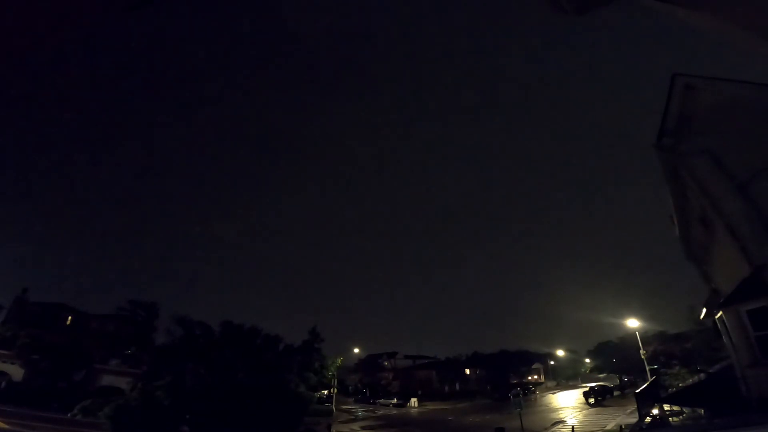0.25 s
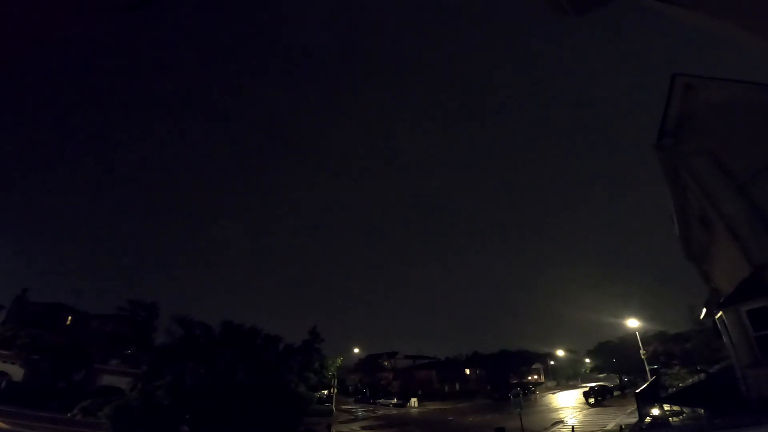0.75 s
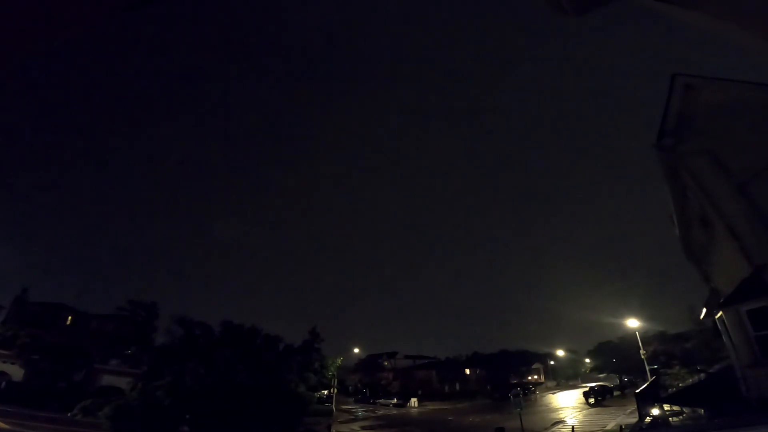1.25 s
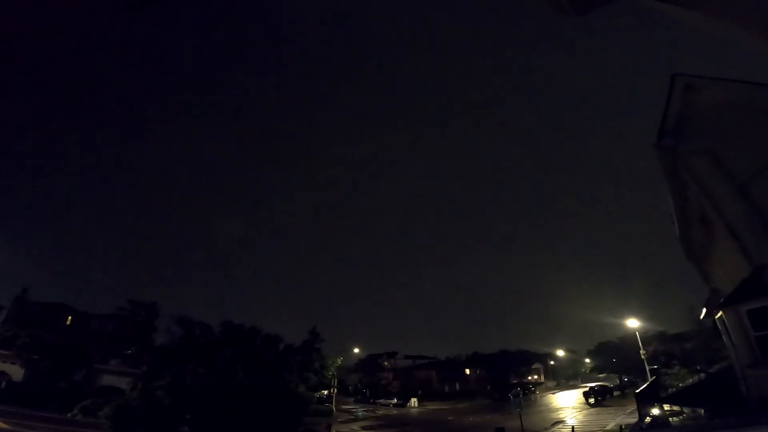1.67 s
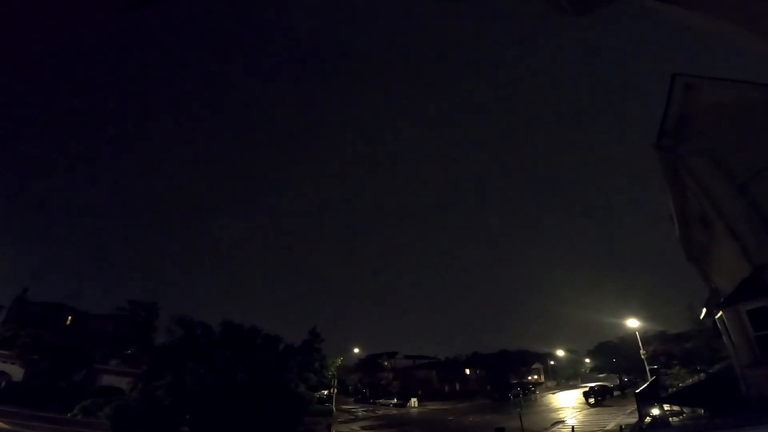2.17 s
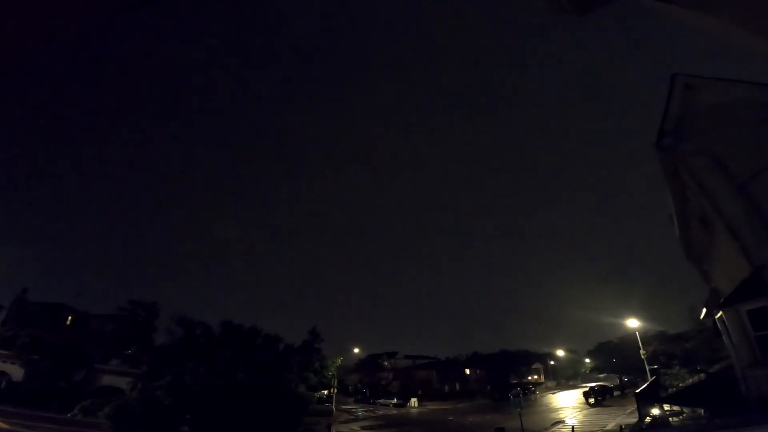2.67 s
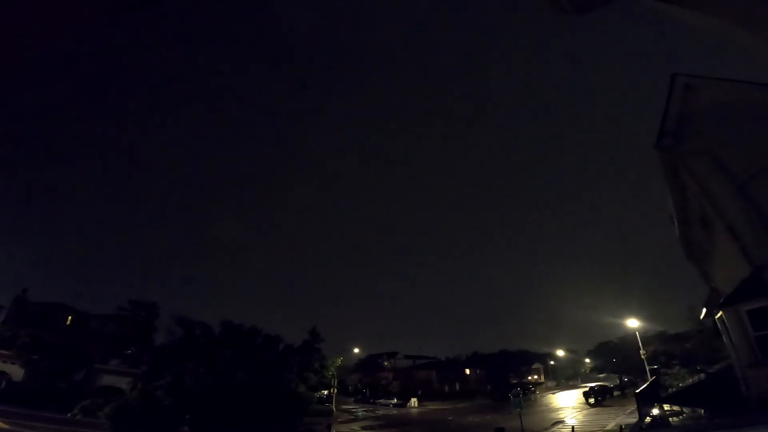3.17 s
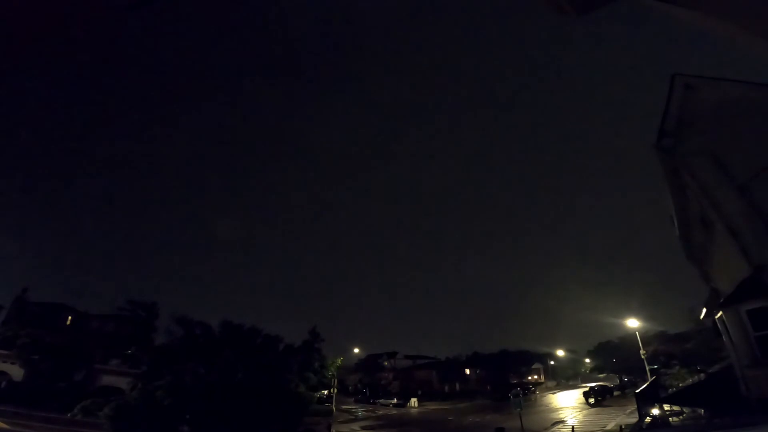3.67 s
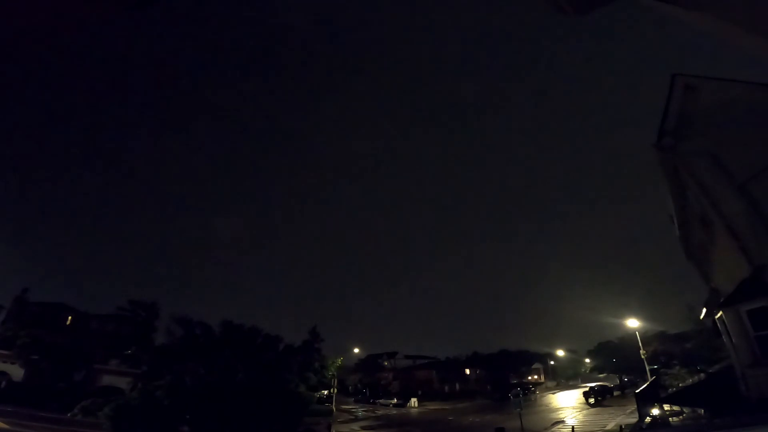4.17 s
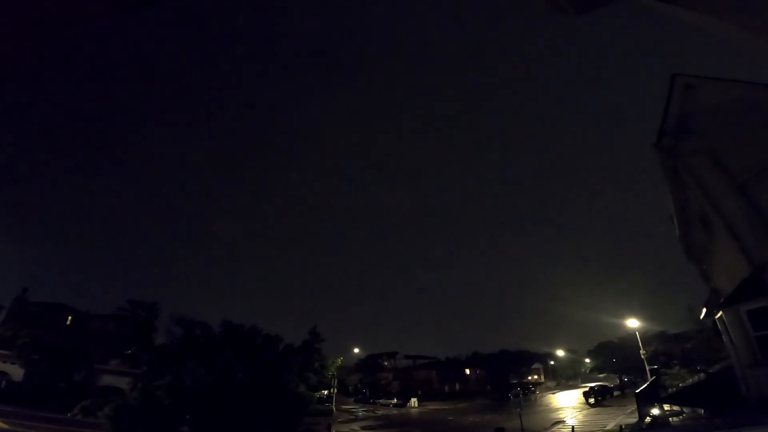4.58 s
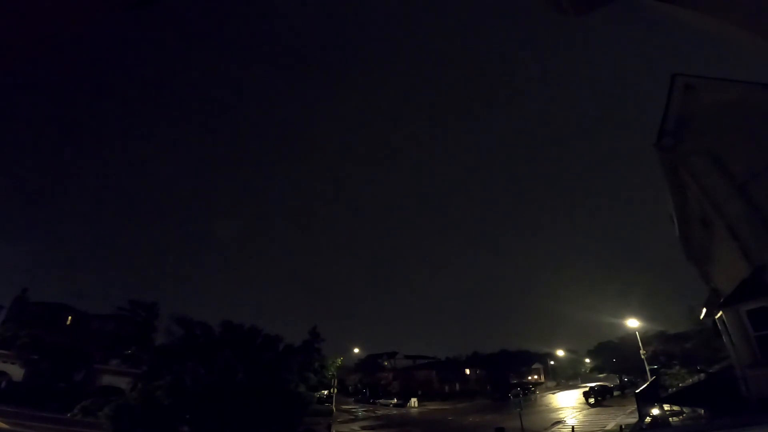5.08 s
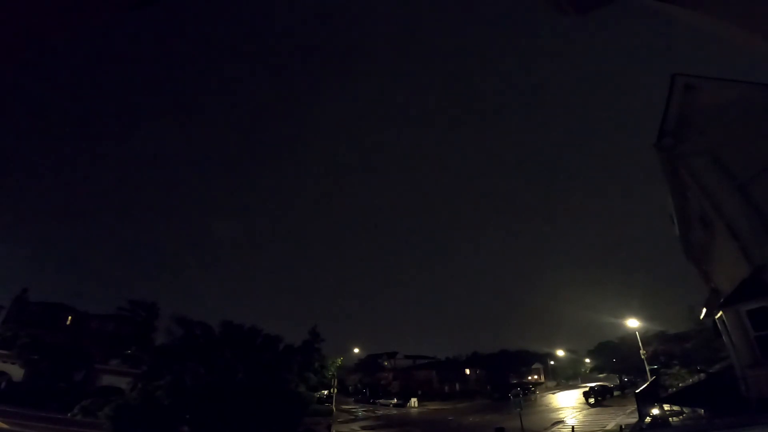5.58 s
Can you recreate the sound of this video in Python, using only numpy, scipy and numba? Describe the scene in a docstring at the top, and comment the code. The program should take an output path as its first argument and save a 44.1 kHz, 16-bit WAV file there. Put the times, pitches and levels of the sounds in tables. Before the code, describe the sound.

Outdoor stereo pickup under house fronts: a quiet start of rain wash and faint high chirps, then deep thunder arrives in tumbling bumps and muffled cracks. It peaks just before three seconds, heaves again around four and five, then sinks away. Drips tap sharply near the microphone throughout. Bird warbles poke through the later rumble, and the rain dips slightly under the loudest rolls.

```python
"""A street at night between house fronts: distant thunder rolls in waves over light rain, drops and birds.
Rain is filtered noise and patter; near drops are band-limited bursts; three birds are gliding near sines.
Thunder sums dense impulses in three bands with N-shaped claps, sharp cracks and low thuds.
House fronts scatter echoes to two close microphone ports; a slow gain control ducks the rain
under the loudest rolls."""
import sys
import numpy as np
from scipy import signal
from scipy.fft import rfft, irfft, next_fast_len
from scipy.io import wavfile
from scipy.ndimage import uniform_filter1d
from numba import njit

SR = 44100
rng = np.random.default_rng(int(sys.argv[2]) if len(sys.argv) > 2 else 0)


def gain_from_db(level_db):
    """Convert decibel levels to linear amplitude factors (20 dB per decade)."""
    decades = np.asarray(level_db, float) / 20
    return 10 ** decades


def pcm_store(signal):
    """Save signal as 16-bit PCM."""
    levels = np.round(np.clip(np.atleast_2d(signal), -1, 1) * 32767)
    wavfile.write(sys.argv[1], SR, levels.astype(np.int16).T)


N = 257103
TIME = np.arange(N) / SR
SIZE = next_fast_len(N + SR)  # room for echoes past the end
FREQ = np.maximum(np.fft.rfftfreq(SIZE, 1 / SR), 1)

# how the two ports differ: f/Hz, left minus right level/dB, phase by which left leads/rad,
# share of steady sound from the front (0-1)
PORT_PAIR = [(25, .9, 0, .993), (60, .5, 0, .998), (200, .5, -.06, .997), (400, .9, -.15, .975),
             (700, 1.5, -.35, .91), (1300, 2, -.75, .76), (1950, 2.5, -1.2, .71), (2500, 3, -.2, .71),
             (4000, 3, -.5, .56), (4800, 2, -.8, .46), (5800, 1, -2.8, .46), (8000, -.5, -2, .31),
             (10000, -1.5, -1.3, .41), (15000, -2, -1, .51)]


def on_freq(table, column=1):
    """Spectral interpolation: a table column drawn straight on a log-frequency axis."""
    rows = np.array(table, float)
    return np.interp(np.log(FREQ), np.log(rows[:, 0]), rows[:, column])


def shape(x, gain):
    """Linear filtering: multiply the spectrum by a gain."""
    return irfft(rfft(x, SIZE) * gain, SIZE)[..., :N]


def unit(x):
    """Normalisation of power: scale to rms 1."""
    return x / np.sqrt(np.mean(x ** 2))


def walk(rate):
    """Slow random modulation: levels held 1 / rate s and slewed twice, with a spread near 1."""
    hold = int(SR / rate)
    steps = np.repeat(rng.standard_normal(N // hold + 1), hold)
    return 1.3 * uniform_filter1d(uniform_filter1d(steps, hold), hold)[:N]


def clicks(rate, scatter_db):
    """Shot noise: impulses at random moments, rate per second, mostly small with a few large."""
    when, sign, luck = rng.random((3, N))
    size = gain_from_db(-scatter_db * np.log(luck + .01))
    return (when < rate / SR) * np.sign(sign - .5) * size


def walls(x, t60, gap_s):
    """Diffuse reflection: decaying echoes off the house fronts, different at each port, total energy 1."""
    t = np.arange(SR // 2) / SR
    tail = rng.standard_normal((2, len(t))) * 1000. ** (-t / t60) * (t > gap_s)
    tail = tail / np.sqrt((tail ** 2).sum(axis=1, keepdims=True))
    return signal.fftconvolve(x[None], tail, axes=1)[:, :N]


def ports(front, around, share):
    """Spatial coherence: front sound keeps the ports' level and phase offset, sound from around is unrelated."""
    side = np.array([[.5], [-.5]])
    lean = gain_from_db(side * on_freq(PORT_PAIR))
    turn = np.exp(1j * side * on_freq(PORT_PAIR, column=2))
    share = np.clip(share, 0, 1)
    direct = shape(front, lean * turn * np.sqrt(share))
    return direct + shape(around, lean * np.sqrt(1 - share))


def rain():
    """Superposed drop impacts: a far wash flickering by octave, with fine patter and sparse splashes."""
    # colour of the rain: f/Hz, relative level/dB
    colour = [(60, -63), (170, -20.5), (400, -6), (700, -2), (1100, 2.5), (1550, -1.5), (1900, -0.5),
              (2250, -9), (2480, -4.5), (2700, -4), (3000, -8.5), (3400, -7.5), (4000, -11), (5600, -12.5),
              (7000, -18.5), (9000, -23), (11000, -35), (12500, -37.5), (15000, -54.5), (17000, -73.5)]
    gust = walk(0.83)
    # three signals each: front, left and right
    patter = np.array([unit(clicks(1100, scatter_db=5.0)) for _ in range(3)])
    noise = rng.standard_normal((3, N))
    # a nearer drop lifts the hiss for the few ms of its splash
    splash = signal.lfilter([1], [1, -np.exp(-1 / (.005 * SR))], np.abs(clicks(22, scatter_db=3)))
    wash = 0
    for hz in 250 * 2. ** np.arange(7):
        octave = np.cos(np.pi / 2 * np.clip(np.log2(FREQ / hz), -1, 1)) ** 2
        spray = noise * (1 + .42 * min(hz / 8000, 1) * splash)
        flicker = gain_from_db(0.4 * gust + 1.0 * walk(11))
        wash = wash + shape(spray + .5 * patter, octave) * flicker
    wash = gain_from_db(-46.5) * unit(shape(wash, gain_from_db(on_freq(colour))))
    return ports(wash[0], wash[1:], on_freq(PORT_PAIR, column=3))


def small_drops():
    """Poisson arrivals: random drops (s, dB, Hz, width Hz, left minus right dB), weaker towards high pitch."""
    rate, low_hz, high_hz = 60, 1800, 11000  # drops a second, range of centres
    base_db, scatter_db, fall_db = -54, 4, 6  # fall per octave above the lowest centre
    when, pitch, luck, side = rng.random((600, 4)).T
    s = np.cumsum(-np.log(1 - when)) / rate
    hz = low_hz * (high_hz / low_hz) ** pitch
    db = base_db - scatter_db * np.log(luck + .03) - fall_db * np.log2(hz / low_hz)
    rows = zip(s, db, hz, .8 * hz, 8 * side - 2)
    return [row for row in rows if row[0] < N / SR - .06]


def drops():
    """Impact excitation: each drop is a quick splat in its own band, duller on top, then a short splash."""
    # single drops close by: t/s, peak level/dB, centre f/Hz, width/Hz, left minus right level/dB
    near_drops = [(.164, -54, 8500, 2000, 4), (.571, -38, 5500, 5000, 1), (.6913, -42, 3000, 2500, 2),
                  (.7776, -44, 3500, 3000, 2), (1.0214, -42, 7500, 6000, 0), (1.4162, -41, 3500, 3000, 3),
                  (1.4785, -44, 3500, 3000, 2), (1.694, -27, 3200, 3600, 5), (1.808, -46, 6500, 3500, 2),
                  (1.9634, -47, 8500, 2500, 5), (1.9929, -39, 2500, 900, 2), (2.0024, -44, 2800, 1500, 2),
                  (2.1485, -43, 3600, 2000, 2), (2.5077, -35, 4200, 3600, 1), (2.7621, -37, 4300, 4600, -1),
                  (2.9487, -38, 6900, 1500, 0), (3.2264, -50, 12000, 5000, -1),
                  (3.7394, -42, 4500, 3500, 2), (4.2153, -45, 3000, 1500, 4), (4.2383, -44, 2400, 2000, 3),
                  (4.9024, -47, 5500, 2500, 3), (5.1692, -44, 3500, 2500, 1), (5.4084, -48, 11000, 4000, 0),
                  (5.445, -40, 3600, 3600, 2)]
    out = np.zeros((2, N))
    t = np.arange(SR // 20) / SR
    fall = .2 * np.exp(-t / .002) + .15 * np.exp(-t / .008)
    dull = signal.butter(2, 4000, fs=SR, output="sos")
    for s, db, hz, width, pan_db in near_drops + small_drops():
        band = signal.butter(3, [hz - width / 2, hz + width / 2], "bandpass", fs=SR, output="sos")
        burst = 2 * (t == 0) + rng.standard_normal(len(t)) * fall
        splat = signal.sosfilt(np.vstack([band, dull]), burst)
        levels = gain_from_db(db + np.array([[pan_db / 2], [-pan_db / 2]]))
        k = int(s * SR)
        out[:, k:k + len(t)] += levels * splat / np.abs(splat).max()
    # they land close and ahead, so the ports differ less in phase
    direct = shape(out, np.exp(1j * np.array([[.4], [-.4]]) * on_freq(PORT_PAIR, column=2)))
    return direct + gain_from_db(-9) * walls(out.mean(axis=0), t60=.2, gap_s=.003)


def whistle(note):
    """Frequency modulation: a near sine along a note's pitch and level; the throat rounds every turn."""
    s, hz, db = np.transpose(note)
    edge = np.clip(np.minimum(TIME - s[0], s[-1] - TIME) / 0.0024, 0, 1)
    hz, db = (uniform_filter1d(np.interp(TIME, s, c), size=220) for c in (hz, db))
    return np.sqrt(2) * edge * gain_from_db(db) * np.sin(2 * np.pi * np.cumsum(hz) / SR)


def plain(s, length, first_hz, last_hz, db):
    """Linear glide: pitch moves straight; the level is held between slightly louder ends."""
    share = np.array([0, .3, .7, 1])  # of the length
    levels = db + 1.5 * np.array([1, 0, 0, 1])
    return whistle(np.transpose([s + share * length, first_hz + share * (last_hz - first_hz), levels]))


def birds():
    """Comb filtering: a ground echo beads the near singer's higher glides; all three ring off the walls."""
    # the near singer's slurred phrases, one table each: t/s, f/Hz, source level/dB
    slurs = [
        [(3.228, 4140, -54), (3.24, 3730, -44.5), (3.254, 3310, -42), (3.268, 2940, -41.5), (3.285, 2570, -46),
         (3.308, 2270, -51)],
        [(3.326, 2795, -63), (3.334, 3400, -40.5), (3.343, 3660, -43), (3.358, 3290, -37), (3.37, 2870, -39.5),
         (3.383, 2510, -52), (3.395, 2310, -54), (3.415, 2190, -49), (3.428, 2200, -53.5), (3.445, 2310, -48),
         (3.482, 2570, -46), (3.5, 2680, -46.5), (3.517, 2560, -56)],
        [(3.894, 2810, -49), (3.918, 2910, -38.5), (3.93, 3010, -44.5), (3.952, 3040, -44.5)],
        [(4.538, 3130, -37), (4.562, 3186, -39.5), (4.578, 3150, -39), (4.604, 2884, -35), (4.616, 2920, -41),
         (4.626, 3125, -41), (4.643, 3200, -37), (4.658, 3220, -47), (4.672, 2950, -36.5), (4.69, 2790, -38.5),
         (4.716, 2790, -42)],
        [(5.698, 2540, -47), (5.709, 2645, -43), (5.716, 3230, -41), (5.726, 3150, -39), (5.734, 3230, -33),
         (5.741, 3350, -27.5), (5.745, 3820, -36), (5.753, 2450, -33)],
    ]
    # its plain notes; the first, faint one is the warble's echo ringing on:
    # start t/s, length/s, first f/Hz, last f/Hz, held source level/dB
    near_notes = [(4.71, .12, 3130, 3180, -52), (5.68, .018, 3300, 3340, -45),
                  (5.755, .029, 3270, 3370, -43), (5.776, .033, 2620, 2260, -47)]
    # the high singer's plain notes: start t/s, length/s, first f/Hz, last f/Hz, held source level/dB
    high_notes = [(.03, 0.018, 5100, 5000, -57), (.052, .018, 4200, 4150, -57),
                  (.088, .013, 7550, 7650, -56), (.102, .018, 7850, 8150, -60),
                  (.122, 0.03, 7930, 7900, -57.5), (.152, .016, 8000, 8300, -61),
                  (.166, .014, 7360, 7050, -65)]
    # the far, low singer, heard with some ring off the walls, each note from its own side:
    # start t/s, length/s, first f/Hz, last f/Hz, held source level/dB, left minus right level/dB
    far_notes = [(3.965, 0.087, 2205, 2235, -51, 8), (4.068, 0.042, 2480, 2270, -51, -11.5),
                 (4.112, 0.062, 2290, 2410, -58, -14), (5.207, 0.025, 2480, 2440, -49.5, -17),
                 (5.239, .035, 2450, 2020, -52, -2)]
    warble = sum(whistle(slur) for slur in slurs) + sum(plain(*note) for note in near_notes)
    high = sum(plain(*note) for note in high_notes)
    # the ground returns only the higher pitches, 2.4 ms late
    ground = .92 / (1 + (2600 / FREQ) ** 12) * np.exp(-2j * np.pi * FREQ * .0024)
    flutter = gain_from_db(1.5 * walk(70))
    song = (shape(warble, .6 * (1 + ground)) + high) * flutter
    ring = shape(walls(.7 * warble + high, t60=.6, gap_s=.006), 1 / (1 + (FREQ / 5000) ** 4))
    near = ports(song, ring, 0.82)
    side = np.array([[.5], [-.5]])
    low = sum(gain_from_db(side * pan_db) * plain(*note) for *note, pan_db in far_notes)
    return near + ports(low, walls(low.mean(axis=0), t60=.25, gap_s=0.01), 0.74)


def claps():
    """N-wave: each clap is a rounded shock of pressure, a push and then a pull."""
    # claps that stand out of the roll: t/s, peak level/dB, length/ms
    clap_rows = [(.7152, -11, 3.4), (1.111, -19, 3.4), (1.453, -13, 4), (1.647, -11, 3.6),
                 (1.7575, -16, 2.2), (2.047, -18, 2.6), (2.689, -11, 3.4), (3.541, -21, 2.6),
                 (3.778, -20, 2.6), (3.873, -17, 3.6), (4.271, -23, 2.6), (4.543, -23, 2.4),
                 (4.905, -19, 3.6), (5.014, -17, 4)]
    out = np.zeros(N)
    for s, db, length_ms in clap_rows:
        u = (TIME - s) / (length_ms / 4000) - 2  # -2 to 2 over the length
        out += gain_from_db(db) * -u * np.exp(.5 - u ** 2 / 2)
    return out


def cracks():
    """Impulse response: each crack is one steep front and a short rough tail, dulled by the distance."""
    # sharp cracks on top of the roll: t/s, peak level/dB
    crack_rows = [(0.648, -37.5), (0.718, -23), (1.031, -31), (1.172, -38.5), (1.294, -23.5), (1.328, -26),
                  (1.438, -29.5), (1.461, -23.5), (1.522, -26.5), (1.651, -19), (1.757, -25.5),
                  (2.047, -27.5), (2.407, -25), (2.652, -26.5), (2.689, -21), (2.711, -26.5), (2.785, -26),
                  (3.502, -28), (3.542, -26), (3.78, -31.5), (3.878, -30.5), (4.545, -31), (5.06, -34),
                  (5.147, -24)]
    out = np.zeros(N)
    t = np.arange(SR // 20) / SR
    band = signal.butter(4, [380, 850], "bandpass", fs=SR, output="sos")
    for s, db in crack_rows:
        tail = .12 * rng.standard_normal(len(t)) * np.exp(-t / .008)
        crack = signal.sosfilt(band, (t == 0) + tail)
        k = int(s * SR)
        out[k:k + len(t)] += gain_from_db(db) * crack / np.abs(crack).max()
    return out


def thuds():
    """Damped oscillation: each thud is a few cycles of one low pitch that rise fast and die away."""
    # low thuds inside the roll: t/s, peak level/dB, f/Hz
    thud_rows = [(0.659, -13.5, 196), (1.074, -12, 153), (1.331, -12.5, 137), (1.383, -14.5, 95),
                 (1.42, -13, 330), (1.429, -15.5, 105), (1.457, -18.5, 380), (1.46, -15, 150),
                 (1.492, -14, 115), (1.533, -15.5, 120), (1.551, -13.5, 145), (1.565, -15.5, 105),
                 (1.617, -14, 85), (1.646, -10, 150), (1.671, -16.5, 190), (1.721, -10.5, 150),
                 (1.758, -14, 110), (1.873, -10, 153), (2.007, -15, 127), (2.201, -12, 183),
                 (2.359, -13.5, 170), (2.404, -18.5, 180), (2.513, -17.5, 170), (2.567, -16, 145),
                 (2.612, -12.5, 130), (2.626, -12.5, 170), (2.675, -11.5, 210), (2.69, -13, 200),
                 (2.7, -12, 85), (2.733, -4, 155), (2.74, -12.5, 390), (2.77, -10.5, 220),
                 (2.793, -9.5, 250), (2.806, -9.5, 260), (2.82, -13.5, 65), (2.845, -14.5, 170),
                 (2.98, -16.5, 170), (3.022, -9, 150), (3.718, -14.5, 116), (3.888, -19, 160),
                 (3.914, -11.5, 110), (4.78, -17, 140), (4.793, -17, 250), (4.808, -15.5, 105),
                 (4.838, -21.5, 85), (4.885, -10.5, 180), (4.985, -22, 95), (5.01, -12.5, 190),
                 (5.037, -16.5, 240), (5.06, -19, 130), (5.072, -14.5, 260), (5.107, -14, 200),
                 (5.128, -12, 190), (5.332, -23, 215)]
    rise_cycles = 1.22
    out = np.zeros(N)
    for (s, db, hz), turn in zip(thud_rows, rng.random(len(thud_rows))):
        u = np.maximum(TIME - s, 0) * hz / rise_cycles
        out += gain_from_db(db) * u * np.exp(1 - u) * np.sin(2 * np.pi * (hz * TIME + turn))
    return out


def thunder():
    """Superposed shock fronts: a long crooked channel sends them densely; three bands swell apart."""
    # thunder arriving: t/s, body level/dB, crackle level relative to the body/dB
    rolls = [(0, -31.5, -12), (0.451, -31.5, -11), (.7, -23, -4.5), (.84, -27, -6), (1.03, -24, -9),
             (1.09, -22, -5.5), (1.3, -20, -9), (1.36, -21, 0), (1.45, -19, -2), (1.55, -17.5, -4.5),
             (1.78, -20, -2.5), (1.93, -21.5, -5), (2.08, -17.5, -9.5), (2.24, -19, -8.5),
             (2.33, -19, -4.5), (2.451, -17, -5), (2.6, -17.5, -5.5), (2.68, -18.5, -1), (2.76, -19, 0),
             (2.84, -18, -3), (2.87, -17, -8.5), (2.949, -18.5, -9.5), (3.01, -14, -12.5),
             (3.08, -21, -8.5), (3.3, -18.5, -11), (3.5, -19.5, -12.5), (3.66, -24.5, -4.5),
             (3.9, -15, -13.5), (4.05, -23.5, -9.5), (4.14, -22.5, -9), (4.3, -20.5, -12),
             (4.45, -23.5, -9.5), (4.66, -23.5, -7.5), (4.76, -23.5, -10), (4.82, -20, -9), (4.93, -22, -7),
             (5.02, -19.5, -7), (5.13, -19, -6.5), (5.17, -23.5, -9.5), (5.24, -23.5, -11.5),
             (5.83, -27, -14.5)]
    # slower swell of the deep rumble: t/s, level/dB
    deep_swell = [(0, -37.5), (.16, -38.5), (.45, -37.5), (.68, -26.5), (.94, -40), (1.6, -21.5),
                  (2.1, -26), (2.45, -26), (3.04, -23), (3.2, -31.5), (4.0, -31.5), (4.35, -29.5),
                  (4.64, -33), (4.96, -26.5), (5.83, -36.5)]
    # colour of the deep rumble: f/Hz, relative level/dB
    deep_colour = [(8, -60), (16, -17), (22, -6), (38, 0), (55, -3), (75, -14), (110, -40), (300, -130)]
    # colour of the body: f/Hz, relative level/dB
    body_colour = [(15, -99), (42, -35), (62, 1.5), (100, 0.5), (135, 0.5), (160, 0.5), (190, -3),
                   (260, -6.5), (380, -42.5), (1000, -130)]
    # colour of the crackle: f/Hz, relative level/dB
    crackle_colour = [(60, -100), (170, -9), (260, -1.5), (350, -1), (580, -11), (800, -19), (1100, -21),
                      (1600, -33.5), (2300, -53), (6000, -130)]
    s, body_db, crackle_db = np.transpose(rolls)
    parts = (  # colour, swell in dB, lumpiness in dB
        (deep_colour, np.interp(TIME, *np.transpose(deep_swell)), .1),
        (body_colour, np.interp(TIME, s, body_db), .4),
        (crackle_colour, np.interp(TIME, s, body_db + crackle_db), 1.2))
    roll = claps() + cracks() + thuds()
    for colour, db, lumpy_db in parts:
        part = unit(shape(clicks(1800, scatter_db=1.5), gain_from_db(on_freq(colour))))
        roll = roll + part * gain_from_db(db + lumpy_db * walk(22.026))
    return ports(roll, walls(roll, t60=0.065, gap_s=0.0083), on_freq(PORT_PAIR, column=3))


def scene():
    """Superposition: rain, drops, birds and thunder add at the two ports."""
    return rain() + drops() + birds() + thunder()


@njit
def follow(power, start, attack, release):
    """Leaky integration: a loudness memory that climbs fast and sinks slowly."""
    out, e = np.empty(len(power)), start
    for i in range(len(power)):
        e += (power[i] - e) * (attack if power[i] > e else release)
        out[i] = e
    return out


def low_pass(x):
    """Removes everything above the highest recorded frequency."""
    return signal.sosfilt(signal.butter(12, 15650, fs=SR, output="sos"), x)


def record(dry):
    """Dynamic range compression: slow gain control turns everything down while the thunder is loud."""
    knee_db, squeeze = -23, .6  # squeeze: dB of cut per dB well above the soft knee
    start_db = -22  # loudness remembered at first
    attack_s, release_s = .14, .8
    power = uniform_filter1d((dry ** 2).mean(axis=0), SR // 20)
    loudness = follow(power, gain_from_db(start_db) ** 2, 1 / (attack_s * SR), 1 / (release_s * SR))
    loud_db = 10 * np.log10(loudness)
    gain_db = -squeeze * 2 * np.logaddexp(0, (loud_db - knee_db) / 2)
    return low_pass(dry * gain_from_db(gain_db))


dry = scene()
out = record(dry)
pcm_store(out)
```